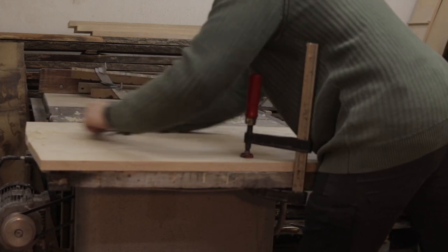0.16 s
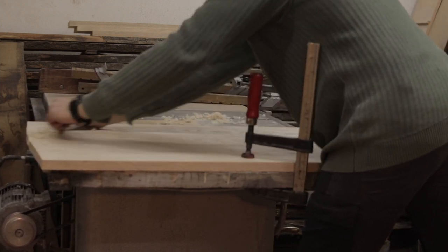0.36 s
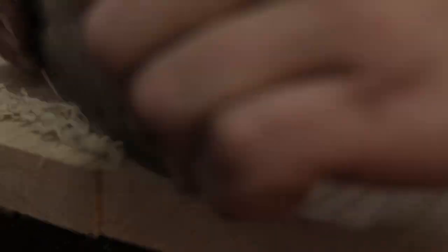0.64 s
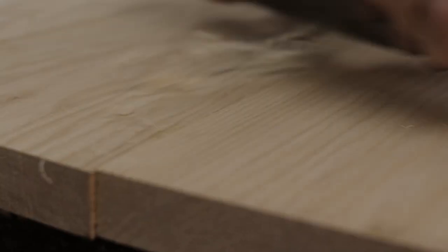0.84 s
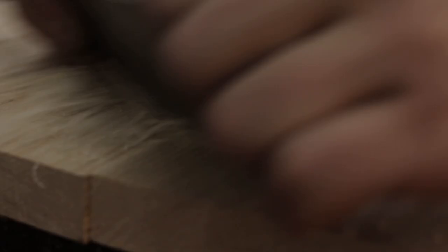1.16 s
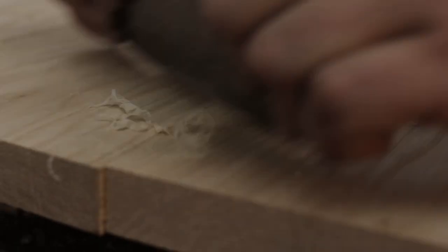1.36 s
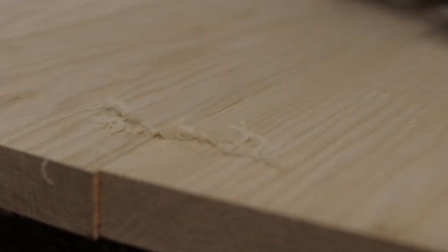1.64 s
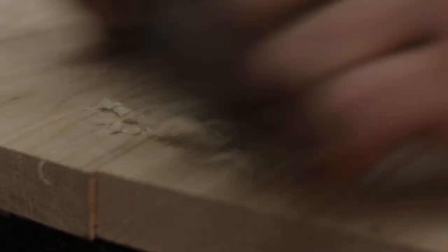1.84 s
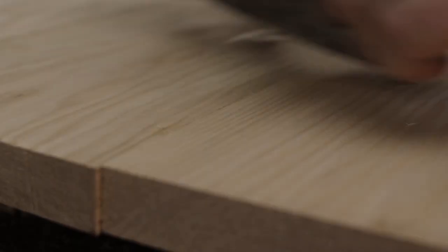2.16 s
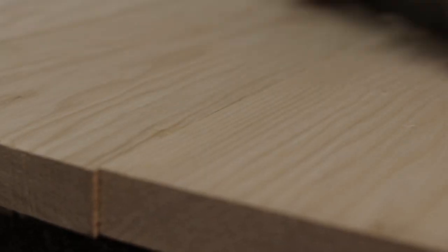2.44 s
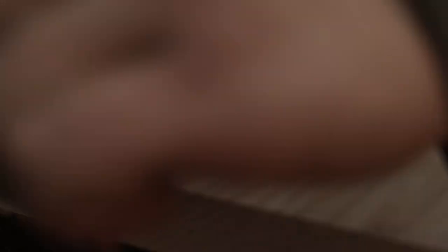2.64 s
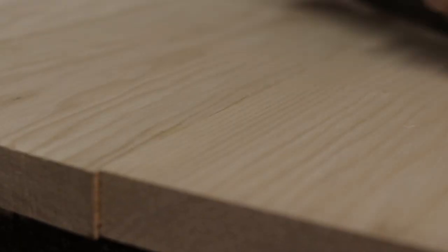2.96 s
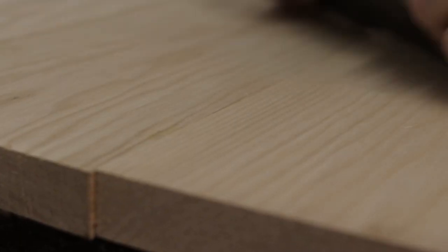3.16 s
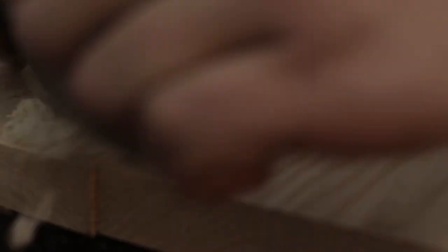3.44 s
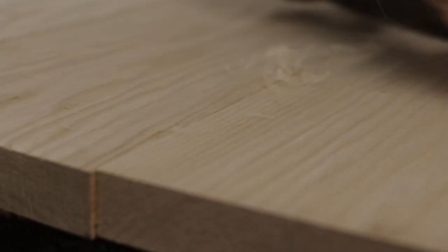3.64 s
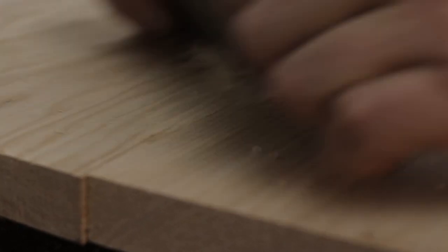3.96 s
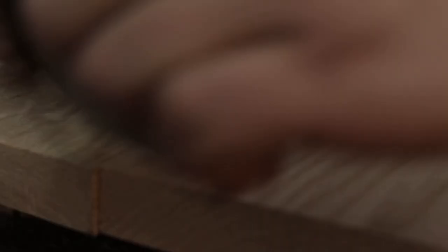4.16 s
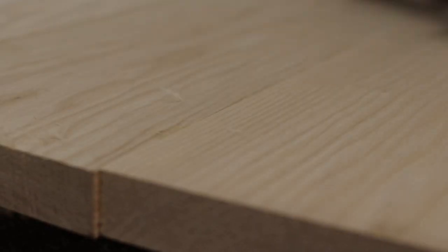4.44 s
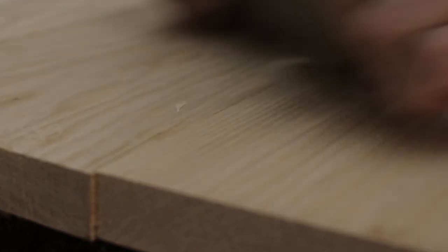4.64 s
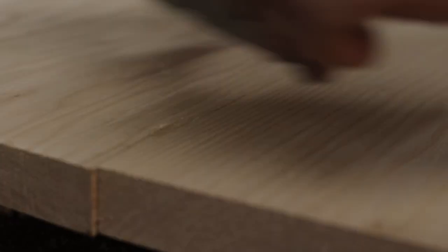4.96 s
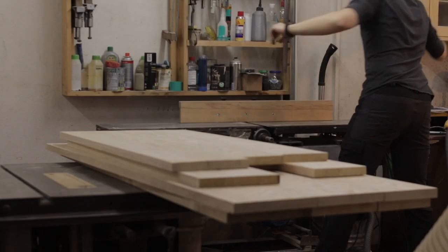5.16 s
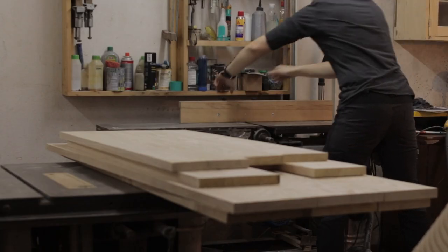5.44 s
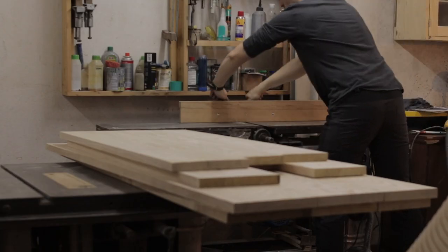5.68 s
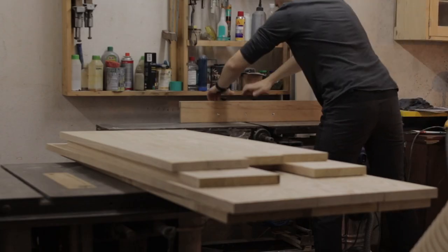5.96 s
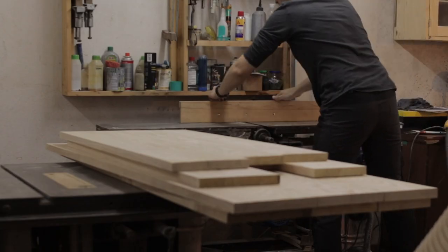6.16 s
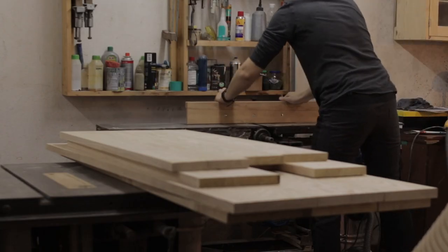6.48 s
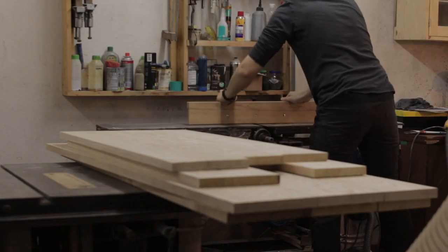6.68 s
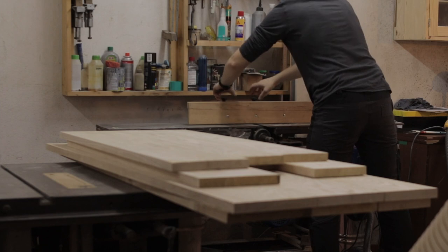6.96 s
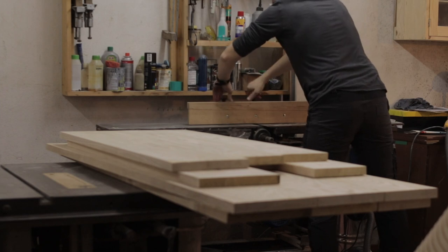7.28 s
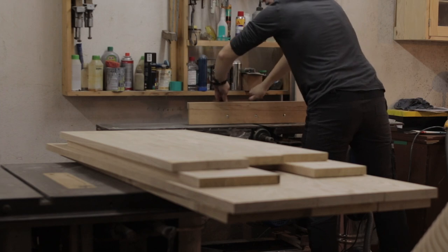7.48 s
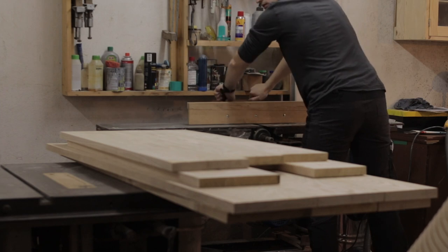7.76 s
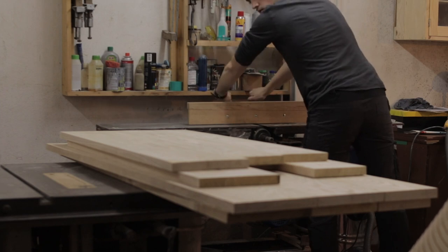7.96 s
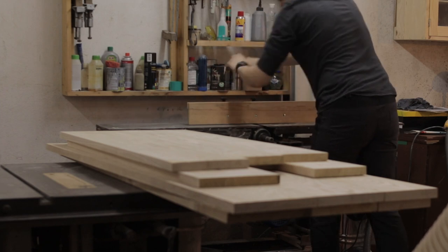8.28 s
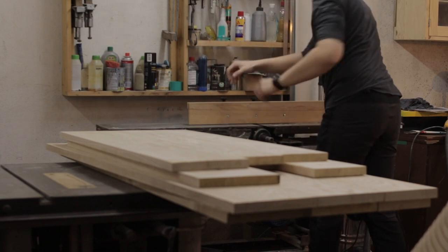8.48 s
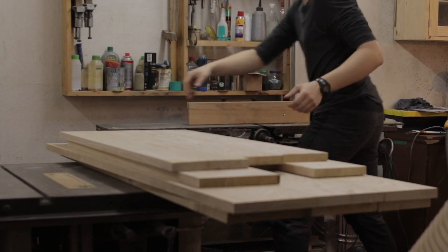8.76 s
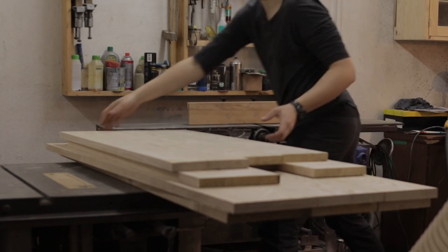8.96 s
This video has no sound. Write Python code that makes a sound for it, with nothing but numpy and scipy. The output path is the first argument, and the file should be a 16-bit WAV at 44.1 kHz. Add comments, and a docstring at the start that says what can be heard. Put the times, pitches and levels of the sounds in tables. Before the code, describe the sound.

Dry scraping strokes tear along wood in a quiet workshop, then a hard cut to a droning woodworking machine with rough, surging chip noise.

```python
"""A hand scraper is pulled along a glued wooden panel in a workshop: one stroke from afar, then seven close by.
Its edge tears fibres (noise with tiny snaps), judders now and then (bursts of slips) and makes the panel boom.
Abruptly a jointer takes over: a three-knife cutter block hums and whines, the motor drones (wavering tones),
and a board is fed across the knives (surging noise). A few squeaks of wood and a quiet room complete it."""
import sys
import numpy as np
from scipy import signal
from scipy.fft import rfft, irfft, next_fast_len
from scipy.io import wavfile
from scipy.ndimage import uniform_filter1d, map_coordinates

SR = 44100
rng = np.random.default_rng(int(sys.argv[2]) if len(sys.argv) > 2 else 0)


def transcribe(signal):
    """Save signal, clipped to [-1, 1], as a 16-bit WAV file at the path in sys.argv[1]."""
    frames = np.atleast_2d(signal).T
    limited = np.clip(frames, -1, 1)
    pcm = np.round(limited * 32767).astype(np.int16)
    wavfile.write(sys.argv[1], SR, pcm)


N = 401751
TIME = np.arange(N) / SR
NEAR_S, MACHINE_S = 0.513, 5.032  # when the close strokes and the jointer begin, in seconds

# The close strokes. Each row: contact, fastest moment and lift in seconds, then tearing, fine hiss, rubbing
# and panel boom in dB (before the layers' trims), blade ring in Hz, blade ring in dB.
STROKES = [(0.412, 0.499, 0.69, -41.5, -41, -52.5, -63, 3560, 1),
           (1.09, 1.222, 1.3, -42.5, -41.3, -53, -63, 4310, 0.5),
           (1.801, 1.948, 2.056, -40.5, -39.8, -48.5, -53, 4400, 6),
           (2.485, 2.651, 2.74, -42.5, -42, -49.5, -56, 4250, 3.5),
           (3.15, 3.355, 3.501, -48, -47, -56, -66.5, 3280, -0.5),
           (3.88, 4.024, 4.21, -47, -45.5, -54.5, -61.5, 4000, 2),
           (4.592, 4.767, 4.868, -44, -42.5, -54.5, -62, 3900, 1.5)]
# Spectrum of the panel's boom. Each row: frequency in Hz, relative level in dB per Hz.
BOOM_SPECTRUM = [(21, -53.5), (40, -31.5), (80, -7.5), (135, -3.5), (180, -0.5), (260, -10), (340, -5.5),
                 (480, -23), (840, -100)]
# How alike left and right are. Each row: frequency in Hz, coherence from 0 to 1.
HAND_ALIKE = [(60, 0.93), (130, 0.96), (290, 0.86), (640, 0.79), (1410, 0.41), (3100, 0.44), (6820, 0.14),
              (15000, 0.12)]
MACHINE_ALIKE = [(60, 0.88), (130, 1), (290, 0.99), (640, 0.84), (1410, 0.74), (3100, 0.45), (6820, 0.22),
                 (15000, 0.07)]
# Speed of the cutter block. Each row: time in seconds, turns per second.
BLOCK_SPEED = [(5.0, 83.78), (9.1, 83.88)]


def amp(db):
    """Turn decibels into gain."""
    return 10 ** (np.asarray(db) / 20)


def unit(x):
    """Scale to rms 1."""
    return x / np.sqrt(np.mean(x ** 2) + 1e-20)


def along(points, hz):
    """Read a value between (Hz, value) points on a log frequency axis."""
    f, v = np.transpose(points)
    return np.interp(np.log(hz + 1), np.log(f + 1), v)


def curves(rows):
    """Draw straight lines between rows: one value per sample for each column after the time."""
    s, *columns = np.transpose(rows)
    return [np.interp(TIME, s, column) for column in columns]


def wobble(rate):
    """A smooth random curve through `rate` random knots a second."""
    coarse_s = np.linspace(0, TIME[-1], 2000)
    knots = rng.standard_normal(int(N * rate / SR) + 4)
    return np.interp(TIME, coarse_s, map_coordinates(knots, [coarse_s * rate]))


def after(s, rise=0.0032):
    """A gate that starts to open at time s and is open `rise` seconds later."""
    return np.clip((TIME - s) / rise, 0, 1)


def filtered(x, response):
    """Multiply the spectrum of x by a response of frequency."""
    m = next_fast_len(N + SR // 4)
    return irfft(rfft(x, m) * response(np.fft.rfftfreq(m, 1 / SR)), m)[..., :N]


def noise():
    """Two unrelated white noises."""
    return rng.standard_normal((2, N))


def grains(rate, share):
    """White noise with tiny snaps of random size, `rate` a second, that hold a share of the power."""
    snaps = (rng.random(N) < rate / SR) * noise()
    share = np.clip(share, 0, 1)
    return np.sqrt(share) * unit(snaps) + np.sqrt(1 - share) * noise()


def coloured(pair, spectrum, alike):
    """Mix two unrelated signals into a stereo sound whose middle has rms 1; less alike means more side."""
    def middle_and_side(hz):
        turn = np.arccos(np.clip(along(alike, hz), -1, 1)) / 2
        return amp(along(spectrum, hz)) * np.array([np.cos(turn), np.sin(turn)])

    mid, side = filtered(pair, middle_and_side)
    return np.array([mid + side, mid - side]) / np.std(mid)


def panned(x, left_db):
    """Raise the left channel against the right by left_db."""
    return x * amp(np.outer([1, -1], left_db) / 2)


def reverb(x):
    """The workshop's answer at both microphones: noise that dies away at its own pace in each band."""
    # Each row: frequency in Hz, time to fall by 60 dB in seconds.
    decay_times = [(100, 0.63), (1000, 0.18), (4000, 0.36), (14000, 0.061)]
    hz, t, z = signal.stft(rng.standard_normal((2, SR // 2)), SR, nperseg=256)
    fading = z * amp(-60 * t / along(decay_times, hz)[:, None])
    tail = signal.istft(fading, SR, nperseg=256)[1]
    return signal.fftconvolve(np.atleast_2d(x), tail / np.linalg.norm(tail[0]), axes=1)[:, :N]


def resonance(hz, centre_hz, q):
    """The response of one ringing mode: a causal band-pass."""
    damping = 1j * hz * centre_hz / q
    return damping / (centre_hz ** 2 - hz ** 2 + damping)


def tone(phase, hz):
    """A stereo machine tone (phase in cycles); reflections shift it between the microphones."""
    shift = rng.choice([-1, 1]) * np.arccos(np.clip(along(MACHINE_ALIKE, hz), -1, 1)) / 2
    angle = (2 * np.pi * ((phase + rng.random()) % 1)).astype(np.float32)
    return np.sqrt(2) * np.array([np.sin(angle + np.float32(shift)), np.sin(angle - np.float32(shift))])


def running_tones(table, waver_db, drift):
    """Free-running tones, each wavering in level and phase (drift in cycles)."""
    total = 0
    for hz, db in table:
        waver = unit(amp(waver_db * wobble(8)))
        total = total + waver * amp(db) * tone(hz * TIME + drift * wobble(6), hz)
    return total


def quiet_room():
    """The still room: soft low noise and a few faint steady hums."""
    # Each row: frequency in Hz, relative level in dB per Hz.
    still_spectrum = [(25, -36), (60, -9), (110, -8.5), (180, -10.5), (280, -15.5), (480, -13), (900, -24),
                      (2500, -27.5), (8000, -35.5), (15800, -43)]
    # Each row: frequency in Hz, level in dB.
    hums = [(113, -81), (215.3, -82.5), (323, -90.5)]
    still = amp(-76) * coloured(noise(), still_spectrum, HAND_ALIKE)
    return still + running_tones(hums, waver_db=0.5, drift=0.05)


def squeaks():
    """Short, unsteady notes where wood slides under pressure."""
    # Each row: loudest moment in seconds, half length in seconds, peak level in dB, pitch in Hz.
    notes = [(1.72, 0.03, -84, 1400), (2.44, 0.025, -83, 1430), (4.36, 0.04, -82, 1480),
             (4.495, 0.02, -75.5, 1480), (4.54, 0.015, -81, 1470), (6.42, 0.035, -35, 1240),
             (7.02, 0.03, -41, 2350)]
    unsteady = 0.11 * wobble(120)  # cycles
    total = np.zeros(N)
    for s, half_length, db, hz in notes:
        swell = np.exp(-((TIME - s) / half_length) ** 2)
        total += amp(db) * swell * np.sin(2 * np.pi * (hz * TIME + unsteady))
    return total


def housed(x):
    """The iron housing rings briefly and prints a fixed comb of fine peaks on the noise."""
    t = np.arange(SR // 8) / SR
    ring = rng.standard_normal((2, len(t))) * amp(-60 * t / 0.2)  # falls at 60 dB per 0.2 s
    return x + 0.45 * signal.fftconvolve(x, ring / np.linalg.norm(ring[0]), axes=1)[:, :N]


def cutter_tones(turns):
    """Three knives chop the air at the table lips like a siren; every tone is locked to the shaft."""
    # Tones that swell and fade as the board moves over the gap.
    # Each row: time in seconds, then the levels in dB of orders 3, 6, 9, 18 and 37.
    swelling_rows = [(5.13, -30, -33, -44, -45, -50), (5.14, -30.5, -33.5, -37.5, -42, -49),
                     (5.44, -30.5, -30, -40.5, -43, -55), (6.09, -31.5, -33.5, -39, -47.5, -46),
                     (6.14, -31, -33.5, -38.5, -43, -53), (6.64, -31.5, -35, -37.5, -38.5, -50),
                     (7.15, -32, -34.5, -32, -40, -44), (7.68, -31.5, -36, -31.5, -46, -48),
                     (7.87, -31, -36, -33, -40, -51), (8.17, -31.5, -36, -31, -43, -42),
                     (8.39, -31.5, -35.5, -40.5, -38, -45), (8.48, -32, -34, -44, -45, -50),
                     (8.54, -31, -32.5, -39.5, -44, -39), (9.0, -30, -32.5, -31.5, -41, -52),
                     (9.08, -30, -32, -35, -40.5, -39)]
    # Other multiples of the block's speed. Each row: order, level in dB.
    steady_orders = [(1, -58), (12, -40), (15, -47.5), (21, -51.5), (24, -49.8), (30, -53), (33, -51),
                     (36, -55.5), (39, -51.5), (45, -63), (48, -58.5), (50, -58), (51, -61), (54, -57.5),
                     (57, -59), (60, -58.5), (66, -60.5), (69, -64.5), (72, -68.5), (75, -64)]
    shaft_hz = np.mean(BLOCK_SPEED, axis=0)[1]
    orders = list(zip((3, 6, 9, 18, 37), curves(swelling_rows))) + steady_orders
    total = 0
    for order, db in orders:
        waver_db = min(0.1 * order, 1.6) * wobble(9)
        total = total + amp(db + waver_db) * tone(order * turns, order * shaft_hz)
    return total


def fan_tone():
    """One steady pitch that swells and fades."""
    # Each row: time in seconds, level in dB before the 1.1 dB lift below.
    fan_rows = [(5.07, -43), (5.31, -34), (5.42, -48), (5.53, -35.5), (5.73, -45), (6.02, -33), (6.23, -48),
                (6.36, -40), (6.42, -54), (6.5, -38.5), (6.9, -39.5), (6.99, -49), (7.38, -33.5),
                (7.67, -43.5), (7.97, -35.5), (8.19, -51), (8.24, -40), (8.39, -36), (8.55, -48),
                (8.81, -38), (8.87, -50), (9.08, -37)]
    fan_hz = 597.5
    fan_db, = curves(fan_rows)
    return amp(fan_db + 1.1) * tone(fan_hz * TIME + 0.032 * wobble(6.8), fan_hz)


def motor_drone():
    """The strongest motor tone swells and fades over the other tones of motor, belt and frame."""
    # Each row: time in seconds, level of the strongest tone in dB before the 1.5 dB lift below.
    motor_rows = [(5.07, -44), (5.98, -46), (6.06, -39.5), (6.83, -50), (8.22, -40), (9.06, -39.5),
                  (9.08, -44)]
    # Each row: frequency in Hz, level in dB.
    drone_tones = [(65.5, -55.5), (165.5, -56), (199.2, -51.5), (263.8, -53), (329.9, -43), (335, -52),
                   (391, -50), (550.6, -49.3), (634.7, -52.5), (849.7, -53.5), (1062, -55), (1123, -54)]
    motor_hz = 383.1
    motor_db, = curves(motor_rows)
    phase = motor_hz * TIME + 0.04 * wobble(6)
    motor = amp(motor_db + 1.5 + 1.2 * wobble(7.3)) * tone(phase, motor_hz)
    return motor + running_tones(drone_tones, waver_db=1.5, drift=0.049)


def bearing_whine():
    """Many thin high tones from the bearings, strongly wavering."""
    # Each row: frequency in Hz, level in dB.
    whine_tones = [(1835, -54), (1968, -55), (2325, -56), (2389, -56), (2745, -54), (3066, -54.5),
                   (3416, -51), (3487, -52), (3900, -56.5), (4013, -57), (4194, -61.5), (4527, -62.5),
                   (4680, -58.5), (5001, -58.5), (5534, -67), (6828, -69), (6996, -69), (7480, -67)]
    return running_tones(whine_tones, waver_db=6.5, drift=0.22)


def churned_air():
    """Air churned by the block: low noise that eases as the board covers it."""
    # Each row: frequency in Hz, relative level in dB per Hz.
    air_spectrum = [(25, -21), (45, -2), (80, -0.5), (122, -5), (170, 3.5), (400, 4), (700, 3.5),
                    (1150, 1.5), (1350, -0.5), (1800, 0), (2600, -17), (5000, -51.5)]
    start_db, fall_db_per_s = -33.5, 0.5
    air_db = start_db - fall_db_per_s * (TIME - MACHINE_S) + 0.5 * wobble(12)
    return amp(air_db) * coloured(housed(noise()), air_spectrum, MACHINE_ALIKE)


def flying_chips():
    """Chips leaving the board: grainy noise that surges once per lap of the belt."""
    # Each row: frequency in Hz, relative level in dB per Hz.
    cut_spectrum = [(1000, -27), (1700, -3.5), (2150, -1.5), (2690, 0), (2890, -5), (3150, 1), (3330, -13),
                    (3500, 1.5), (3680, -9), (3900, -5.5), (4950, -8), (5300, -15.5), (7300, -16),
                    (10800, -27.5), (15800, -44)]
    mean_db, surge_db, surge_hz, surge_peak_s = -35.5, 1.0, 5.99, 7.05
    surge = surge_db * np.cos(2 * np.pi * surge_hz * (TIME - surge_peak_s))
    chips = housed(grains(rate=2000, share=0.22))
    return amp(mean_db + surge + 0.49 * wobble(14)) * coloured(chips, cut_spectrum, MACHINE_ALIKE)


def jointer():
    """Siren tones, fan, motor drone, whine, churned air and the rasp of chips leaving the board."""
    speed, = curves(BLOCK_SPEED)
    turns = np.cumsum(speed + 0.015 * wobble(7)) / SR  # turns of the shaft so far
    low = cutter_tones(turns) + fan_tone() + motor_drone() + churned_air()
    high = bearing_whine() + flying_chips()
    return panned(low, -0.52) + panned(high, -1.4)


def shifting(x, blade_ring, depth_db):
    """The blade's moving ring (rows of s, Hz, dB), and weaker passing resonances as the grip changes."""
    hz, t, z = signal.stft(x, SR, nperseg=512)
    s, ring_hz, ring_db = np.transpose(blade_ring)
    distance_hz = hz[:, None] - np.interp(t, s, ring_hz)
    ring = np.interp(t, s, ring_db) * np.exp(-(distance_hz / 330) ** 2)
    # random ups and downs, smoothed over 4 bands and 16 frames
    field = uniform_filter1d(rng.standard_normal(z.shape[1:]), size=4, axis=0)
    field = uniform_filter1d(field, size=16, axis=1)
    return signal.istft(z * amp(ring + depth_db * unit(field)), nperseg=512)[1][:, :N]


def far_stroke():
    """From across the room the stroke is a smooth, diffuse swish over the panel's boom."""
    # Each row: time in seconds, tearing in dB, rubbing in dB, both before the trims below.
    far_course = [(0.0, -48, -55), (0.068, -41, -50), (0.082, -38, -49.5), (0.116, -44, -53),
                  (0.258, -41, -53), (0.384, -46.5, -54.5), (0.45, -61, -60)]
    # Each row: frequency in Hz, relative level in dB per Hz.
    tear_spectrum = [(1180, -37), (2000, -7), (3190, -3), (3890, -4.5), (5900, -6.5), (7070, -6.5),
                     (8620, -11.5), (10600, -13.5), (15800, -21)]
    # The blade's ring. Each row: time in seconds, frequency in Hz, level in dB.
    far_ring = [(0.03, 6500, 7), (0.12, 6800, 6), (0.19, 3280, 2.5), (0.4, 3200, 6)]
    diffuse = [(300, 0.93), (640, 0.71), (1400, 0.15), (15000, 0.05)]  # Hz, coherence
    rub_spectrum = [(120, -46.0), (220, 0.0), (420, -5.5), (700, -0.5), (1400, 3), (2200, -1), (3200, -38.0)]
    tear_db, rub_db = curves(far_course)
    fade_db = 150 * np.maximum(TIME - far_course[-1][0], 0)  # dies away in the room at 150 dB per s
    fibres = shifting(grains(rate=5000, share=0.2), far_ring, depth_db=0.9)
    tear = amp(tear_db - 1.3) * coloured(fibres, tear_spectrum, diffuse)
    rub = amp(rub_db + 0.9) * coloured(noise(), rub_spectrum, diffuse)
    boom = amp(rub_db - 21.5) * coloured(noise(), BOOM_SPECTRUM, HAND_ALIKE)
    return (tear + rub + boom) * amp(-fade_db) * (1 - after(NEAR_S))


def panel_boom():
    """The clamped panel booms as each stroke nears its free end, and rings on after the lift."""
    lead_s = 0.02  # the boom peaks just before the lift
    rise_db_per_s, boom_fade_db_per_s, ring_fade_db_per_s = 150, 48.5, 84
    boom_gain, ring_gain = np.zeros((2, N))
    for _, _, lift, _, _, _, boom_db, *_ in STROKES:
        since = TIME - lift + lead_s
        risen_db = boom_db + rise_db_per_s * np.minimum(since, 0)
        boom_gain += amp(risen_db - boom_fade_db_per_s * np.maximum(since, 0))
        ring_gain += amp(risen_db - ring_fade_db_per_s * np.maximum(since, 0))
    # the higher modes: Hz, relative dB per Hz
    upper = [(250, -14), (400, 2), (490, -3), (570, 0), (750, -5), (1000, -16), (1400, -18), (3000, -42)]
    boom = amp(-1.0) * boom_gain * coloured(noise(), BOOM_SPECTRUM, HAND_ALIKE)
    ring = amp(-7.5) * ring_gain * coloured(noise(), upper, HAND_ALIKE)
    return boom + ring


def contacts():
    """Knocks where the edge lands, and bursts of stick-slip where it catches, with the room's echo."""
    # The edge lands. Each row: time in seconds, starting level in dB, brightness in Hz, 60 dB decay in seconds.
    touches = [(1.032, -73, 12000, 0.14), (1.079, -59.5, 1400, 0.088), (1.797, -37.5, 4190, 0.017),
               (2.488, -60, 3000, 0.04), (3.136, -49, 1400, 0.07), (3.884, -69, 4000, 0.05),
               (3.951, -53, 3500, 0.05), (4.602, -58, 4000, 0.044)]
    # The edge judders. Each row: start in seconds, length in seconds, level in dB, pitch in Hz.
    judders = [(0.457, 0.037, -47, 1100), (1.846, 0.016, -61, 1196), (2.005, 0.03, -41.5, 1400),
               (2.548, 0.013, -50, 1800), (2.72, 0.0091, -38.5, 1370), (4.175, 0.014, -47, 1380),
               (4.675, 0.018, -46.5, 1640)]
    out = np.zeros(N)
    t = np.arange(SR // 8) / SR
    for s, db, bright_hz, t60 in touches:
        colour = signal.butter(3, [240, min(bright_hz, SR / 3)], "band", fs=SR, output="sos")
        knock = unit(signal.sosfilt(colour, rng.standard_normal(len(t)))) * amp(-60 * t / t60)
        out[round(s * SR):][:len(t)] += amp(db) * knock
    for s, length, db, pitch_hz in judders:
        grip = np.clip(t / 0.0055, 0, 1) * np.clip(1 - (t - length) / 0.0062, 0, 1)
        kicks = rng.random(len(t)) < 900 / SR  # about 900 slips a second
        slips = rng.standard_normal(len(t)) * (0.29 + kicks) * grip
        colour = signal.butter(3, [pitch_hz * 0.45, pitch_hz * 1.8], "band", fs=SR, output="sos")
        burst = unit(signal.sosfilt(colour, slips)) * np.sqrt(np.mean(grip ** 2))
        out[round(s * SR):][:len(t)] += amp(db) * burst
    return out + amp(-1.0) * reverb(out)


def through_wood(x):
    """The panel's modes ring on top of what excites them."""
    # Each row: frequency in Hz, width in Hz, level in dB.
    modes = [(493, 9, 6.5), (652, 8.5, 8), (708, 10, 6.5), (750, 8.9, -1.5), (827, 5, 2), (1510, 81, -5),
             (2060, 60, -2)]

    def response(hz):
        return 1 + sum(amp(db) * resonance(hz, mode_hz, mode_hz / width) for mode_hz, width, db in modes)

    return filtered(x, response)


def stroke_level(peak_db, swell_db, drop_db, fade_db_per_s):
    """Gain of one layer: it swells to the fastest moment, drops towards the lift, then fades steadily."""
    gain = np.zeros(N)
    for (contact, fastest, lift, *_), db in zip(STROKES, peak_db):
        span = slice(round(contact * SR), round((lift + 0.5) * SR))
        t = TIME[span]
        before = np.clip((fastest - t) / (fastest - contact), 0, 1)
        beyond = np.clip((t - fastest) / (lift - fastest), 0, 1)
        arch_db = swell_db * before ** 2 + drop_db * beyond ** 2
        fade_db = fade_db_per_s * np.maximum(t - lift, 0)
        gain[span] += amp(db - arch_db - fade_db) * np.clip((t - contact) / 0.018, 0, 1)
    return gain


def close_strokes():
    """The edge snaps fibres by the thousand while the tool rubs over the grain and crosses right to left."""
    # Spectra. Each row: frequency in Hz, relative level in dB per Hz.
    tear_spectrum = [(1180, -29.5), (2000, -0.5), (2150, -3), (2360, 0), (2540, -0.5), (2880, -1),
                     (3440, 4.5), (4390, -1), (4750, 1), (5300, -7.5), (6890, -40.5), (11700, -120)]
    rasp_spectrum = [(4200, -41), (5200, -3.5), (6000, 0.5), (6900, 3), (7700, -1.5), (8700, -8.5),
                     (10000, -40)]
    hiss_spectrum = [(5000, -29.5), (8500, -2.5), (9550, -1.5), (11800, 2.5), (13300, -4.5), (14900, -2.5),
                     (15800, -14)]
    rub_spectrum = [(180, -46.5), (300, -10.5), (450, -7.5), (760, -4), (1100, -0.5), (1430, -0.5),
                    (1800, -5), (2200, -12), (2900, -23), (5000, -100)]
    # The edge digs in or skips. Each row: time in seconds, half length in seconds, change of level in dB.
    bites = [(0.637, 0.042, -6.5), (1.16, 0.015, -2.5), (1.907, 0.0051, 1), (1.969, 0.0087, 3.5),
             (1.996, 0.011, -2), (2.025, 0.014, 7), (2.61, 0.012, 3.5), (2.711, 0.01, -1),
             (2.728, 0.0071, 8.5), (4.09, 0.025, -2), (4.178, 0.015, 5), (4.684, 0.0074, 0)]
    contact, fastest, lift, tear_db, hiss_db, rub_db, _, ring_hz, ring_db = np.transpose(STROKES)
    tearing = stroke_level(tear_db, swell_db=24.8, drop_db=11.3, fade_db_per_s=200)
    hissing = stroke_level(hiss_db, swell_db=37, drop_db=19, fade_db_per_s=280)
    rubbing = stroke_level(rub_db, swell_db=18, drop_db=0.8, fade_db_per_s=150)

    pan_rows, ring_rows = [], []
    for k in range(len(STROKES)):
        # left minus right in dB, back to the centre after the lift
        pan_rows += [(contact[k], -3.5), (lift[k], 2), (lift[k] + 0.1, 0)]
        for s in (contact[k], lift[k]):
            sunk_hz = 2400 * (s - fastest[k])  # the ring sinks by 2400 Hz per s
            ring_rows.append((s, ring_hz[k] - sunk_hz, ring_db[k]))
    pan_db, = curves(pan_rows)

    bite_db = sum(db * np.exp(-((TIME - s) / half_length) ** 2) for s, half_length, db in bites)
    # hard and soft growth rings pass under the edge
    grain = amp(bite_db + 0.87 * wobble(70)) * after(NEAR_S, rise=0.004)
    fibres = shifting(grains(rate=3800, share=0.25), ring_rows, depth_db=1.7)
    tear = tearing * coloured(fibres, tear_spectrum, HAND_ALIKE)
    rasp = amp(-4.5) * np.sqrt(tearing * hissing) * coloured(fibres, rasp_spectrum, HAND_ALIKE)
    hiss_trim_db = -1.0 - 0.35 * np.maximum(bite_db, 0)  # the hiss rises less in a bite
    hiss = amp(hiss_trim_db) * hissing * coloured(fibres, hiss_spectrum, HAND_ALIKE)
    rub = amp(-1.0) * rubbing * coloured(grains(rate=900, share=0.3), rub_spectrum, HAND_ALIKE)
    edge = panned(tear + rasp + panned(hiss, 2.7), pan_db) * grain
    return edge + panned(through_wood(rub * grain), 0.8)


def scene():
    """Hand work in a quiet room, then the machine; squeaks lie over both."""
    hand_work = quiet_room() + far_stroke() + panel_boom() + contacts() + close_strokes()
    running = after(MACHINE_S)
    return squeaks() + jointer() * running + hand_work * (1 - running)


def record(dry):
    """The recorder keeps nothing above its band limit of 15800 Hz."""
    return filtered(dry, lambda hz: hz < 15800)


dry = scene()
out = record(dry)
transcribe(out)
```